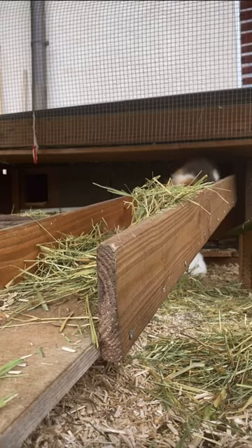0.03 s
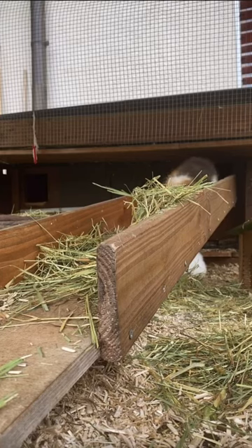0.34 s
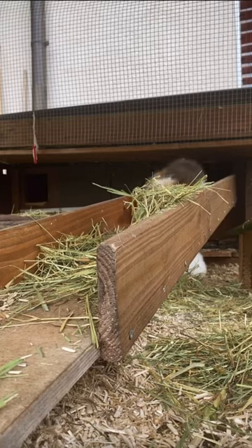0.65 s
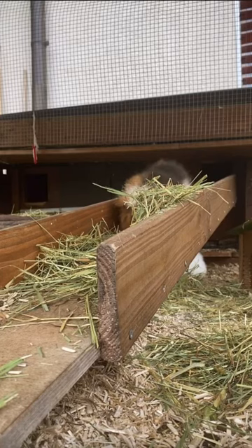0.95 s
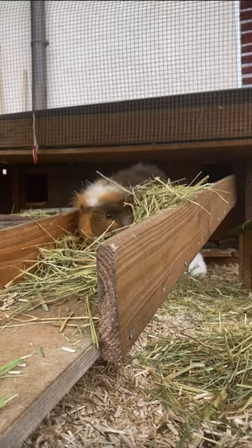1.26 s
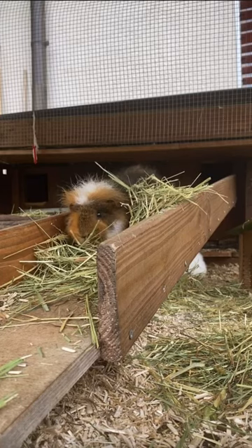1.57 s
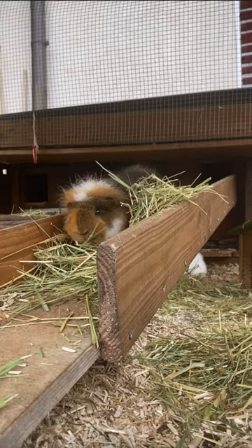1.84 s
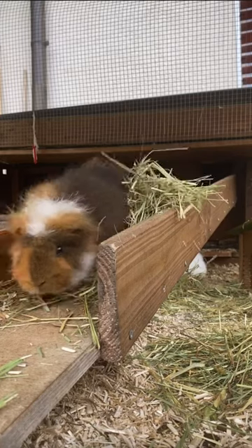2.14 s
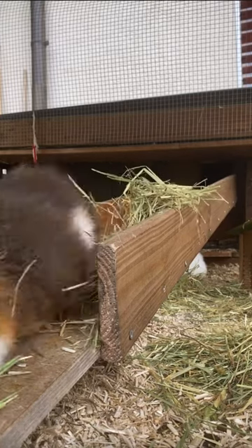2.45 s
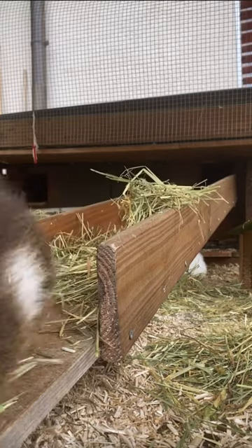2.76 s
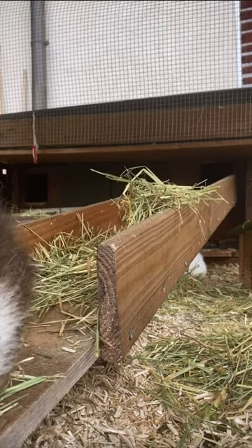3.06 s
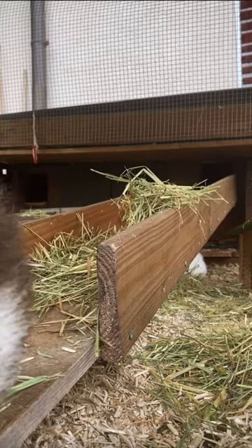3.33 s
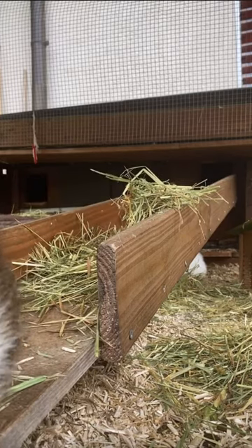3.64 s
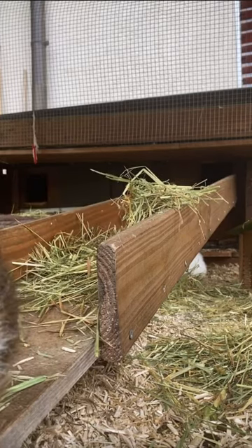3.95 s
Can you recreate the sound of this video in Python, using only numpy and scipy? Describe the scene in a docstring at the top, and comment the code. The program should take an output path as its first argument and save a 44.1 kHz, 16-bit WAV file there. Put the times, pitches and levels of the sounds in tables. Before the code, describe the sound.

A guinea pig makes short, soft clucking squeaks that grow louder as it walks through rustling hay. Stalks snap, its paws knock lightly on wood twice, then it shuffles beside the microphone over a low room hum.

```python
"""Guinea pig in hay

A guinea pig walks through hay towards the microphone and past it, in a wooden pen indoors.
It clucks in short soft calls that dip in pitch and flick up at the end. Hay brushes its fur,
stalks snap, feet scuff and knock on the boards, then shuffle beside the microphone.
Under it lie a low room rumble and a wavering hum."""
import sys
import numpy as np
from scipy import signal
from scipy.fft import rfft, irfft
from scipy.io import wavfile
from scipy.ndimage import map_coordinates

SR = 44100
rng = np.random.default_rng(int(sys.argv[2]) if len(sys.argv) > 2 else 0)


def int16_out(signal):
    """Quantize to a 16-bit WAV file."""
    q = np.round(np.clip(np.atleast_2d(signal).T, -1, 1) * 32767)
    wavfile.write(sys.argv[1], SR, q.astype(np.int16))


N = 176400
TIME_S, BIN_HZ = np.arange(N) / SR, np.fft.rfftfreq(N, 1 / SR)
SIDES = np.array([[1], [-1]])  # left, right
TOP_HZ = 15750


def amp(db):
    """Decibels to gain."""
    return 10 ** (np.asarray(db) / 20)


def unit(x):
    """Scale to unit rms."""
    return x / np.sqrt(np.mean(x ** 2))


def decay(age_s, t60_s):
    """Exponential fall, 60 dB in t60_s."""
    return np.exp(-np.log(1000) * age_s / t60_s)


def curve(rows):
    """Interpolate (time_s, value) rows at every sample."""
    return np.interp(TIME_S, *np.array(rows).T)


def by_pitch(rows):
    """Interpolate (freq_hz, value) rows at every bin, on a log axis."""
    hz, value = np.array(rows).T
    return np.interp(np.log(np.maximum(BIN_HZ, 1)), np.log(hz), value)


def colour(x, rows):
    """Filter by (freq_hz, gain_db) rows, then scale to unit rms."""
    return unit(irfft(rfft(x) * amp(by_pitch(rows)), N))


def walk(rate_hz):
    """Smooth random drift, rate_hz knots a second."""
    knots = rng.standard_normal(int(N / SR * rate_hz) + 4)
    return map_coordinates(knots, [TIME_S * rate_hz], order=2, mode="mirror")


def spread(pair, likeness):
    """Mix two independent noises to left and right of a given correlation."""
    c = np.clip(likeness, 0, 1)
    mid, side = rfft(pair) * np.sqrt(np.array([1 + c, 1 - c]).reshape(2, -1) / 2)
    return irfft(np.array([mid + side, mid - side]), N)


def grains(rate_hz, spread_db, likeness):
    """Stereo stream of tiny clicks, a few much stronger than the rest."""
    size = amp(spread_db * np.minimum(rng.exponential(size=(2, N)), 6))
    hits = rng.random((2, N)) < rate_hz / SR
    return spread(hits * size * rng.standard_normal((2, N)), likeness)


def swells(rows):
    """Sum of Gaussian envelopes from (centre_s, sigma_s, level_db) rows."""
    return sum(amp(db) * np.exp(-.5 * ((TIME_S - centre) / sigma) ** 2) for centre, sigma, db in rows)


def room(hum_hz=81.27):
    """Low rumble, faint hiss and a wavering hum."""
    # freq_hz, gain_db
    spectrum = [(30, -31), (46, -1), (80, 2), (150, -2.5), (220, -10), (310, -8.5), (380, -16), (720, -27),
                (1250, -24), (1650, -31.5), (2300, -27.5), (3100, -37), (4500, -43.5), (6000, -62.5),
                (16000, -56)]
    # freq_hz, left_right_correlation
    likeness = [(100, .998), (210, .95), (330, .55), (600, .05), (1300, .05), (2200, .75)]
    # time_s, level_db
    noise_level = [(0, -47.5), (2.75, -49), (3.7, -46)]
    # time_s, level_db
    hum_level = [(0, -48.5), (.6, -49.5), (.95, -74), (1.13, -45.5), (1.3, -60), (1.75, -45.5),
                 (2.1, -53.5), (2.8, -66.5), (3.03, -46.5), (3.4, -58)]
    noise = colour(spread(rng.standard_normal((2, N)), by_pitch(likeness)), spectrum)
    phase = 2 * np.pi * np.cumsum(hum_hz * (1 + .0333 * walk(12))) / SR
    hum = np.sqrt(2) * np.sin(phase) * amp(curve(hum_level) - .3 * walk(12))
    return noise * amp(curve(noise_level)) + hum


def low_tone(start_s=3.19, length_s=.075, pitch_hz=450, level_db=-55):
    """A faint, brief tone swells and fades."""
    swell = np.abs(np.sin(np.pi * np.clip((TIME_S - start_s) / length_s, 0, 1)))
    return amp(level_db) * np.sqrt(2 * swell) * np.sin(2 * np.pi * pitch_hz * TIME_S)


def hay(band_hz=1100, stalk_db=2.8, boost_db=3.5, flicker_db=.66):
    """Dry stalks slide over fur: dense, bright crackle; each stalk favours its own band."""
    # time_s, level_db (before boost)
    movement = [(0.15, -101), (0.29, -82.5), (0.92, -78), (0.95, -65), (0.99, -76.5), (1.27, -66.5),
                (1.34, -58), (1.5, -61), (1.57, -74.5), (1.82, -94), (1.94, -62.5), (2.01, -63.5),
                (2.05, -54.5), (2.18, -61.5), (2.35, -59.5), (2.37, -55), (2.44, -65.5), (2.52, -58),
                (2.56, -66), (2.62, -57.5), (2.76, -65), (2.82, -59), (2.96, -61), (3.17, -93.5),
                (3.29, -66), (3.51, -85), (3.6, -66.5), (3.64, -74), (3.66, -55.5), (3.69, -71),
                (3.94, -86), (3.97, -68)]
    # freq_hz, gain_db
    spectrum = [(250, 4), (600, -6), (1200, 3), (2400, 5.5), (4200, -0.5), (5300, 2), (15500, 1.5)]
    clicks = rfft(grains(rate_hz=14000, spread_db=2.3, likeness=.85))
    crackle = 0
    for centre_hz in np.arange(0, TOP_HZ + band_hz, band_hz):
        band = np.maximum(1 - np.abs(BIN_HZ - centre_hz) / band_hz, 0)
        crackle += irfft(clicks * band, N) * amp(stalk_db * walk(130))
    return colour(crackle, spectrum) * amp(curve(movement) + boost_db + flicker_db * walk(70))


def scuffs():
    """Feet push through the bedding: duller swells of crackle."""
    # centre_s, sigma_s, level_db
    pushes = [(.66, 0.64, -65), (0.962, 0.011, -58), (1.2, 0.098, -63), (1.37, 0.021, -51.5),
              (1.43, 0.039, -57), (1.462, 0.0087, -52), (1.501, 0.022, -55.5), (2.11, 0.066, -61.5),
              (2.372, 0.049, -56), (2.50, 0.032, -55.5), (2.91, 0.027, -73)]
    # freq_hz, gain_db
    spectrum = [(200, -11), (600, 1.5), (1600, -3.5), (2300, 5.5), (2700, -2), (3200, -13), (6000, -12),
                (12000, -105)]
    return swells(pushes) * colour(grains(rate_hz=4500, spread_db=1.6, likeness=.7), spectrum)


def shuffles(flicker_db=2.5, tap_decay_s=.0036):
    """Feet shuffle and claws tap beside the microphone, nearly in antiphase at its two ports."""
    # centre_s, sigma_s, level_db
    pushes = [(2.95, 0.08, -60), (3.31, 0.068, -59.5), (3.61, 0.047, -62), (3.75, 0.022, -63),
              (3.99, 0.015, -61.5)]
    # freq_hz, gain_db
    crunch_spectrum = [(200, -12), (450, 4.5), (1300, 12), (5000, -6), (12000, -64)]
    # start_s, level_db
    taps = [(3.119, -50.5), (3.528, -58), (3.961, -47.5)]
    # freq_hz, gain_db
    tap_spectrum = [(200, -10), (1300, 15.5), (5000, 1), (10000, -39)]
    push = swells(pushes) * amp(flicker_db * walk(60))
    crunch = push * colour(grains(rate_hz=3000, spread_db=2.5, likeness=.6), crunch_spectrum)
    tap = sum(amp(db) * (TIME_S >= start_s) * np.exp(-np.abs(TIME_S - start_s) / tap_decay_s)
              for start_s, db in taps)
    ticks = tap * colour(spread(rng.standard_normal((2, N)), likeness=1), tap_spectrum)
    return (crunch + ticks) * SIDES


def stalk_ping(start_s=3.717, pitch_hz=3009, level_db=-56, t60_s=.045):
    """A bent stalk springs free and rings briefly."""
    age_s = np.maximum(TIME_S - start_s, 0)
    return amp(level_db) * np.sin(2 * np.pi * pitch_hz * age_s) * decay(age_s, t60_s)


def snaps(width_oct=.45, size=2048):
    """Single stalks break, each a noise burst around its own pitch."""
    # start_s, level_db, centre_hz, decay_s
    breaks = [(.291, -53, 2000, 0.01), (1.272, -58, 4400, 0.0097), (1.351, -48, 10000, 0.0028),
              (1.403, -45, 8040, .0012), (2.051, -51, 9000, 0.0022), (2.487, -49, 2500, 0.0033),
              (2.620, -42, 8500, 0.0013), (2.649, -44, 2470, 0.0037), (2.783, -43.5, 2520, 0.004),
              (2.783, -46, 6800, 0.0026), (2.822, -54, 8060, 0.06), (2.915, -51, 7000, .002),
              (3.659, -42.5, 11500, 0.002), (3.659, -50, 5840, 0.0062), (3.668, -49, 11500, .0025),
              (3.835, -51, 13100, 0.00085)]
    out = np.zeros((2, N))
    hz = np.maximum(np.fft.rfftfreq(size, 1 / SR), 1)
    for start_s, db, centre_hz, decay_s in breaks:
        band = 1 / (1 + (np.log2(hz / centre_hz) / width_oct) ** 2)
        noise = unit(irfft(rfft(rng.standard_normal((2, size))) * band))
        burst = noise * np.exp(-TIME_S[:size] / decay_s) * amp(db)
        i = int(start_s * SR)
        out[:, i:i + size] += burst[:, :N - i]
    return spread(out, likeness=1)


def knocks(contact_s=.00075):
    """A soft paw sets the board's modes ringing."""
    # start_s, level_db
    steps = [(1.602, -42), (2.789, -38)]
    # freq_hz, gain_db, t60_s
    modes = [(282, 3, 0.03), (538, -7.5, 0.066), (638, -12.5, 0.045), (1274, -8.5, 0.036)]
    out = np.zeros(N)
    for start_s, db in steps:
        on = (TIME_S >= start_s) & (TIME_S < start_s + .5)
        age_s = TIME_S[on] - start_s
        ring = sum(amp(gain_db) * np.sin(2 * np.pi * hz * age_s) * decay(age_s, t60_s)
                   for hz, gain_db, t60_s in modes)
        out[on] += amp(db) * ring * (1 - np.exp(-age_s / contact_s))
    return out


def calls():
    """Nearly pure voice with a pulsing rasp; a cluck of throat noise, a sag, then an upward flick."""
    # start_s, length_s, pitch_hz, rise_oct, hold_s, level_db,
    # h2_db, h3_db, h4_db, rasp_db (these four re the fundamental), pan_left_db, left_lead_rad
    notes = [(.151, .028, 696, 0.16, 0.018, -62, -5, -1, -8, -9, -1, 0.12),
             (.537, 0.044, 659, .2, 0.02, -57.5, -9.5, -5, -8, -10, 1, 0.19),
             (.726, 0.047, 664, 0.13, 0.029, -49, -17, -8.5, -14, -16, -0.5, 0),
             (1.067, 0.047, 662, 0.27, 0.027, -48, -15, -8, -16, -22, 0.5, -0.14),
             (1.270, 0.031, 651, 0.0072, .017, -47.5, -14, -8, -11.5, -22, 2, -0.02),
             (1.402, 0.048, 650, 0.29, 0.0274, -47, -11.5, -7, -17, -28, 1, 0.084),
             (1.908, .023, 676, 0.38, 0.011, -45.5, -16.5, -13, -28, -22, 2.5, 0.24),
             (2.039, 0.05, 675.6, 0.38, 0.03, -41, -21.5, -11.5, -31, -24, 1.5, 0.16),
             (2.138, 0.03, 619, 0.19, 0.014, -46, -14.5, -16.5, -28, -11, 1, -0.13),
             (2.272, .049, 658, 0.4, 0.035, -38.5, -16.5, -14, -19.5, -26, 1.5, 0.11),
             (2.430, .049, 652, 0.35, 0.035, -37.5, -15.5, -11, -14.5, -31, 2.5, -0.08),
             (2.597, .051, 621, 0.37, 0.039, -38.5, -12.5, -21, -18.5, -28, 6, 0.46),
             (2.789, 0.048, 611, .23, 0.03, -37, -6.5, -26.5, -35, -24.5, 5, .9),
             (3.272, 0.012, 563, 0, .01, -46, -10.5, -26, -30, -18, 2, 1.3)]
    # freq_hz, gain_db
    rasp_spectrum = [(250, -31), (450, 1.5), (800, 9), (1100, -10.5), (1600, -16), (2400, -9.5),
                     (3200, -16), (8000, -28.5)]
    onset_oct, onset_s, sag_oct_per_s, rise_s = .24, .0028, 1.5, .014
    attack_s, release_s, swell_db = .0012, .004, 1.5
    cluck_db, cluck_s = -10, .0051
    throat_top_hz, dulling_db = 2640, -2.5
    jitter = 1 + .014 * walk(220) + .014 * walk(70)
    shimmer = amp(.9 * walk(150))
    flutter = amp(2.8 * np.array([walk(110) for _ in range(3)]))
    rasp = colour(rng.standard_normal(N), rasp_spectrum)
    out = np.zeros((2, N))
    for start_s, length_s, hz, rise_oct, hold_s, db, *overtones_db, rasp_db, pan_db, lead_rad in notes:
        on = (TIME_S >= start_s) & (TIME_S < start_s + length_s + release_s / 2)
        age_s = TIME_S[on] - start_s
        climb = np.clip((age_s - hold_s) / rise_s, 0, 1)
        dip_oct = onset_oct * np.exp(-age_s / onset_s) - sag_oct_per_s * age_s
        flick_oct = rise_oct * np.sin(climb * np.pi / 2) ** 2
        pitch_hz = hz * jitter[on] * 2 ** (dip_oct + flick_oct)
        phase = 2 * np.pi * np.cumsum(pitch_hz) / SR
        port_rad = SIDES * lead_rad / 2
        pulses = amp(rasp_db) * (1 + np.cos(phase))
        cluck = amp(cluck_db) * np.exp(-age_s / cluck_s)
        voice = np.sin(phase + port_rad) + rasp[on] * (pulses + cluck)
        for k, overtone_db in enumerate(overtones_db, 2):
            throat = 1 / np.sqrt(1 + (k * pitch_hz / throat_top_hz) ** 20)
            gain = amp(overtone_db + dulling_db * climb ** 2) * throat * flutter[k - 2, on]
            voice += gain * np.sin(k * phase + port_rad)
        gate = np.clip(age_s / attack_s, 0, 1) * np.clip((length_s - age_s) / release_s + .5, 0, 1)
        level_db = db + swell_db * (np.sin(np.pi * age_s / length_s) - 1) + SIDES * pan_db / 2
        out[:, on] += np.sqrt(2) * voice * gate * shimmer[on] * amp(level_db)
    return out


def pen(x, ring_band_hz=(550, 1500)):
    """Wooden walls add a short stereo tail and a slightly longer boxy ring."""
    age_s = TIME_S[:SR // 2]

    def tail(noise, t60_s, delay_s, level_db):
        echo = noise * decay(age_s, t60_s) * (age_s > delay_s)
        return amp(level_db) * echo / np.sqrt(np.sum(echo ** 2, axis=1, keepdims=True))

    bandpass = signal.butter(2, ring_band_hz, "bandpass", fs=SR, output="sos")
    boxy = signal.sosfilt(bandpass, rng.standard_normal((2, len(age_s))))
    ring = tail(boxy, t60_s=.2, delay_s=.012, level_db=-33.5)
    walls = tail(rng.standard_normal((2, len(age_s))), t60_s=.15, delay_s=.004, level_db=-15)
    return x + signal.fftconvolve(x, walls + ring, axes=1)[:, :N]


def scene():
    """The animal in its pen, over the room."""
    in_pen = calls() + snaps() + stalk_ping() + knocks() + scuffs() + low_tone()
    return pen(in_pen) + shuffles() + hay() + room()


def record(dry):
    """The two microphone ports differ in phase; the top is cut steeply."""
    # freq_hz, left_lead_rad
    port_phase = [(380, 0), (640, .95), (1300, .75), (1900, 0), (5200, .2), (7250, 3.14), (10000, 6.2),
                  (11400, 6.4), (13400, 9.42), (16000, 11.9)]
    turn = np.exp(.5j * by_pitch(port_phase) * SIDES)
    lowpass = signal.ellip(10, .2, 70, TOP_HZ, fs=SR, output="sos")
    return signal.sosfilt(lowpass, irfft(rfft(dry) * turn, N))


dry = scene()
out = record(dry)
int16_out(out)
```